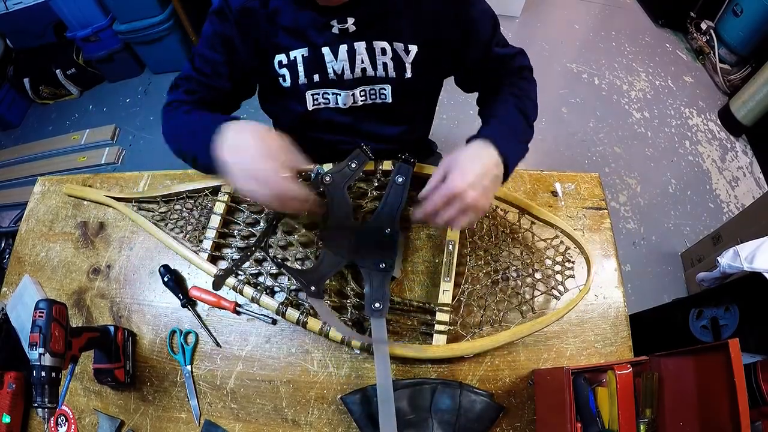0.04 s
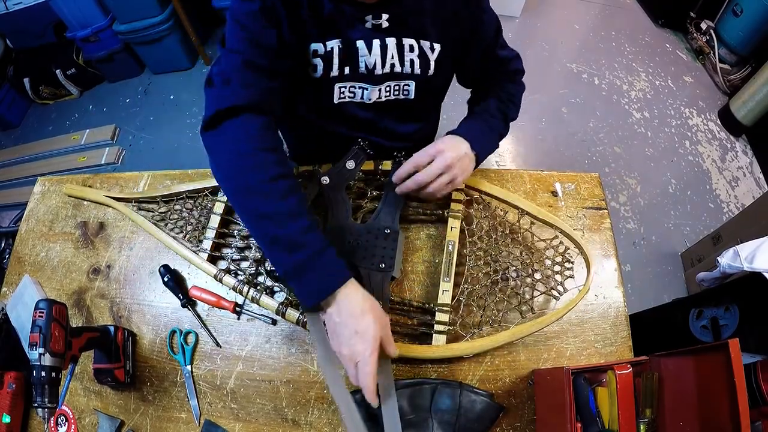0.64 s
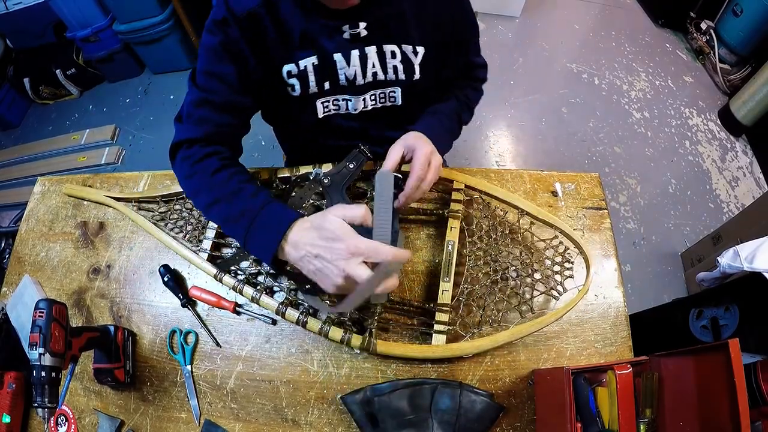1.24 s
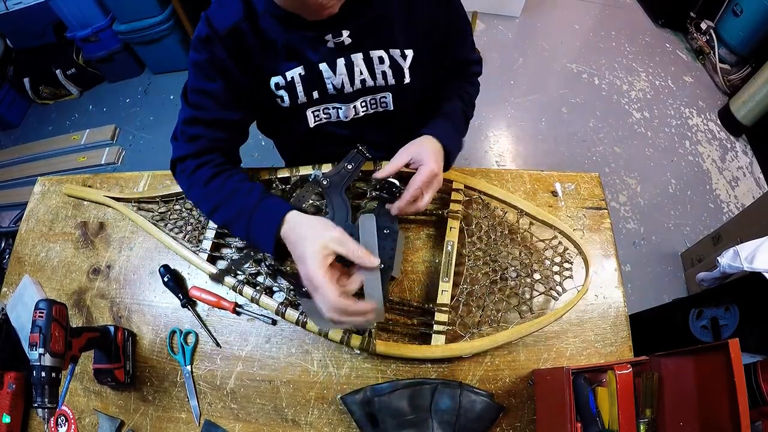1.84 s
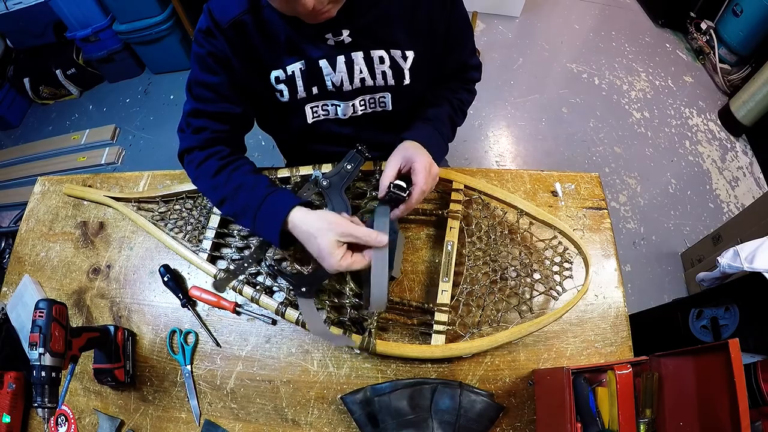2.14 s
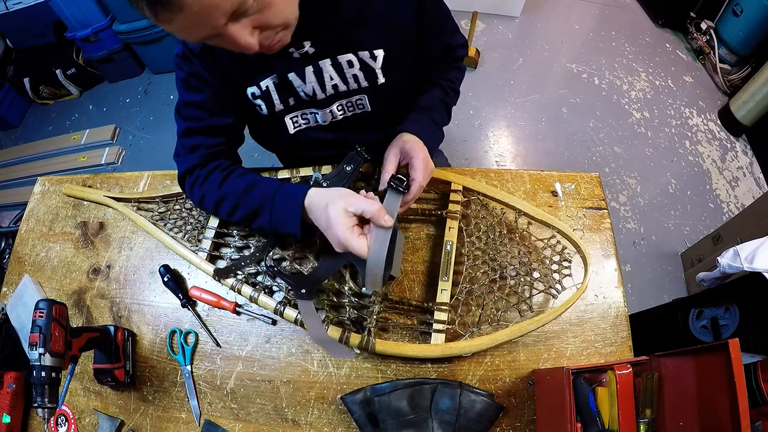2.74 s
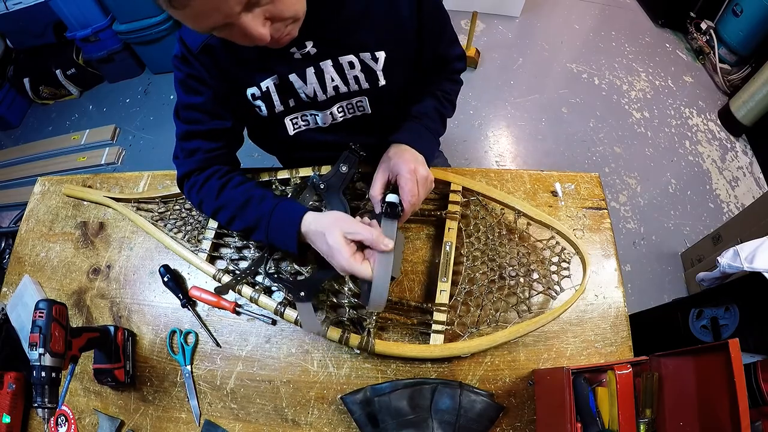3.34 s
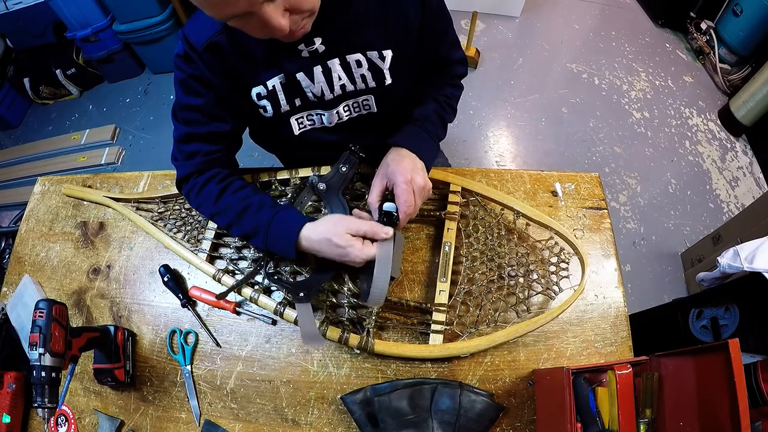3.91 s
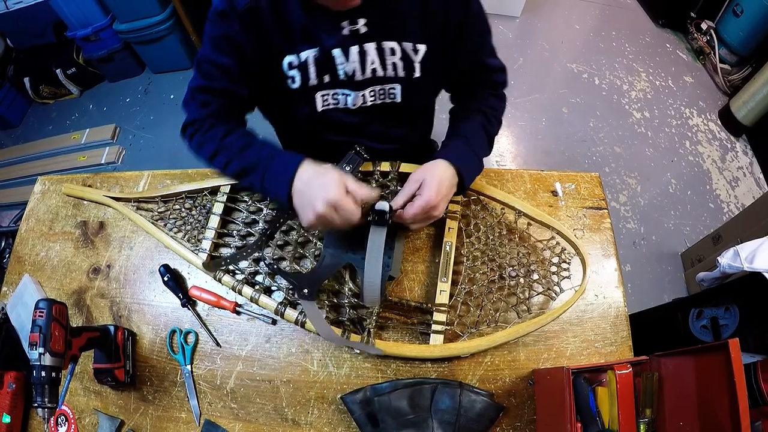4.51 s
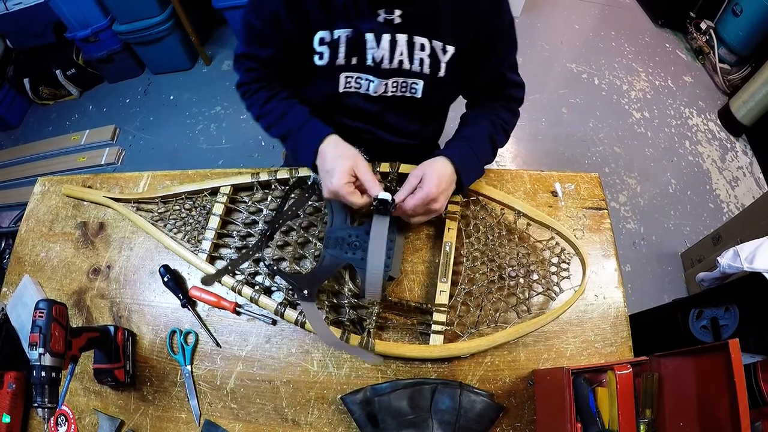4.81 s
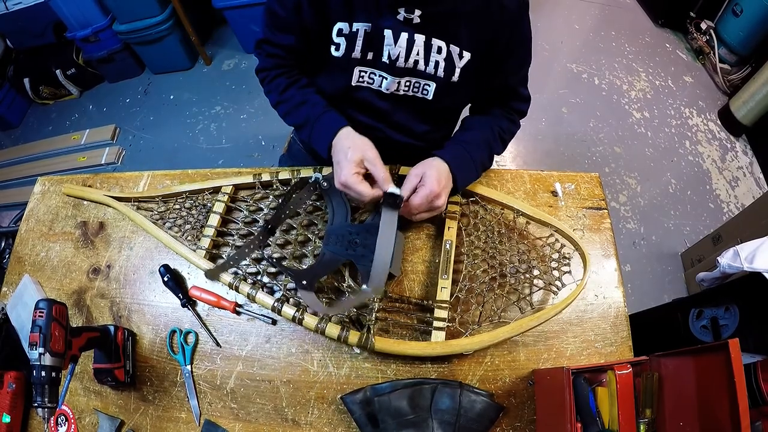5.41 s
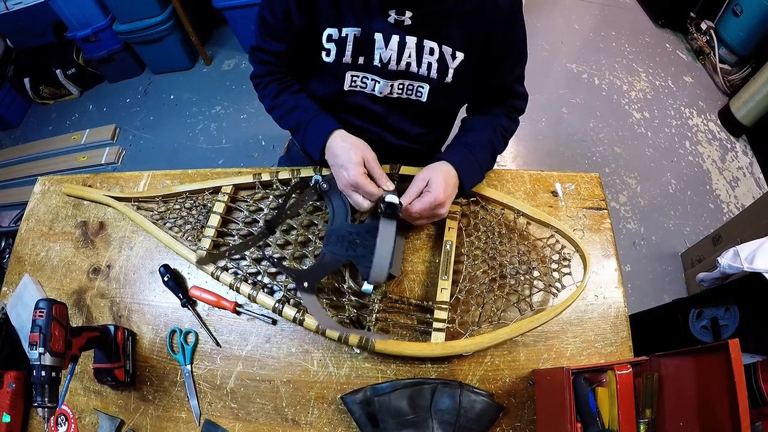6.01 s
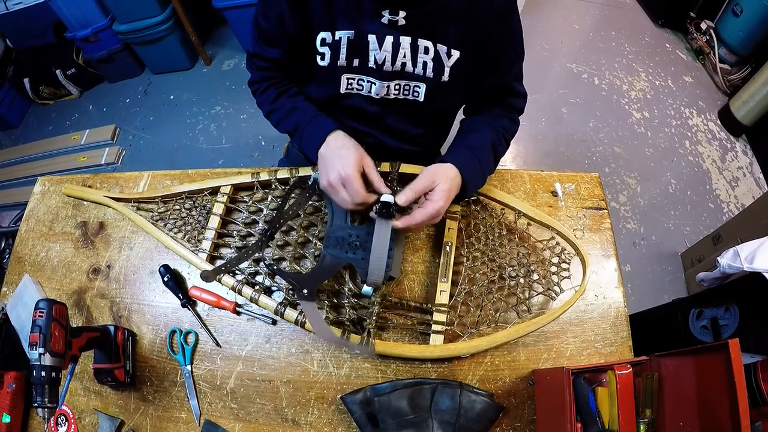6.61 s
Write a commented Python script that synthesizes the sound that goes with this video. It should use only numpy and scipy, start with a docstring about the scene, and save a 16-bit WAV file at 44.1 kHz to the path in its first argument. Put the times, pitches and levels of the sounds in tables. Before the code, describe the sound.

A screwdriver drops and bounces briefly on a wooden workbench. A few faint taps of a metal binding on a snowshoe follow, then the wooden frame knocks on the bench. A toothed strap clicks through a buckle one tooth at a time. Near the end, sleeves rustle softly, the strap zips quickly and the frame thumps loudly, then knocks once more. It all sounds close, in a small workshop with a low hum.

```python
"""Snowshoe binding on a workbench

A screwdriver lands and bounces, ringing the wooden bench top. A toothed strap is threaded into a buckle:
the pawl snaps over single teeth, then zips over a run. The wooden frame knocks on the bench and rocks back.
Strap and sleeves rub faintly over a small workshop's air noise, hum and thin electrical whine."""
import sys
import numpy as np
from scipy import signal
from scipy.fft import rfft, irfft
from scipy.io import wavfile

SR = 44100
rng = np.random.default_rng(int(sys.argv[2]) if len(sys.argv) > 2 else 0)


def pcm_store(signal):
    """Save signal as 16-bit PCM."""
    levels = np.round(np.clip(np.atleast_2d(signal), -1, 1) * 32767)
    wavfile.write(sys.argv[1], SR, levels.astype(np.int16).T)


N = 293706

# Snowshoe frame modes. Each row: frequency in Hz, level in dB, T60 in seconds before contact damping.
FRAME_MODES = [(64.3, -1, 0.209), (140.3, -1, 0.16), (188.4, -5, 0.14), (217, -4.5, 0.49),
               (261, -8.5, 0.19), (316.3, 5, 0.14), (334.4, -4, 0.133), (458, -3, 0.098),
               (533, -5.5, 0.089), (628.8, -1, 0.083), (646.4, 0, 0.055), (712, -2.5, 0.067),
               (763, -3, 0.09), (880, -12.5, 0.09), (898, -15.5, 0.076), (1034, -19.5, 0.099),
               (1242, -12, 0.053), (1322, -18, 0.061), (1403, -17.5, 0.0687)]


def gain_of(db):
    """dB to amplitude factor."""
    return 10 ** (np.asarray(db) / 20)


def unit_rms(x):
    """Scale to rms 1."""
    return x / np.sqrt(np.mean(x ** 2) + 1e-20)


def unit_hit(x):
    """Scale to the energy of 10 ms at rms 1."""
    return x / np.sqrt(np.sum(x ** 2) / (SR * .01))


def curve_at(points, hz):
    """Interpolate on a log-frequency axis."""
    points_hz, values = np.transpose(points)
    return np.interp(np.log(hz + 1), np.log(points_hz + 1), values)


def bump(hz, centre_hz, octaves):
    """Resonant hump of height 1."""
    return 1 / (1 + (np.log2((hz + 1) / centre_hz) / octaves) ** 2)


def add(mix, start_s, sound):
    """Mix in place at start_s."""
    part = mix[max(round(start_s * SR), 0):][:len(sound)]
    part += sound[:len(part)]


def colour(x, db_at, size=4096):
    """Minimum-phase filter with gain db_at(Hz)."""
    log_gain = np.log(gain_of(db_at(abs(np.fft.fftfreq(size, 1 / SR)))))
    impulse = np.fft.ifft(np.exp(np.conj(signal.hilbert(log_gain)))).real
    return signal.fftconvolve(x, impulse[:size // 2])


def noise(gain_at, size):
    """Steady noise, rms 1, spectrum gain_at(Hz)."""
    white = rfft(rng.standard_normal(size))
    return unit_rms(irfft(white * gain_at(np.fft.rfftfreq(size, 1 / SR)), size))


def burst(decay_s, rise_s, size=8192):
    """Dense modes as spectrally flattened noise that swells and dies."""
    t = np.arange(size) / SR
    envelope = np.exp(-t / decay_s) * (1 - np.exp(-t / rise_s))
    spectrum = rfft(rng.standard_normal(size) * envelope)
    flat = irfft(spectrum / (abs(spectrum) + 1e-12))
    return flat * np.minimum(1, 4 * envelope / envelope.max())


def workshop():
    """Moving air, wavering mains hum and fuzzy fan tones."""
    # Air spectrum. Each row: frequency in Hz, relative density in dB.
    air_spectrum = [(15, -38.5), (28, -3), (52, -1.5), (85, -9.5), (160, -16), (300, -18), (500, -26),
                    (1100, -32.5), (1700, -34.5), (2400, -33), (4500, -38), (7000, -44.5), (11000, -50.5),
                    (15000, -51.5)]
    # Machine tones, mains first. Each row: frequency in Hz, level in dB, width in Hz (mains: rms drift).
    machine_tones = [(119.5, -48.5, 0.907), (119.6, -54.5, 8.5), (306.5, -68, 15), (866, -67.5, 32)]
    (mains_hz, mains_db, waver_hz), *fan_tones = machine_tones
    air = gain_of(-48.5) * noise(lambda f: gain_of(curve_at(air_spectrum, f)), N)
    drift_hz = waver_hz * noise(lambda f: 1 / (1 + (f / 3) ** 4), N)
    mains = gain_of(mains_db) * unit_rms(np.sin(2 * np.pi * np.cumsum(mains_hz + drift_hz) / SR))
    fans = sum(gain_of(db) * noise(lambda f: 1 / (1 + (2 * (f - hz) / width_hz) ** 2), N)
               for hz, db, width_hz in fan_tones)
    return air + mains + fans


def whine(centre_hz=8550, width_hz=130, pips_per_s=30, pip_s=.0025, first_s=.0167):
    """Narrow-band electrical hiss flaring in regular pips."""
    phase = np.pi * pips_per_s * (np.arange(N) / SR - first_s)
    pips = gain_of(-13) + np.exp(-(np.sin(phase) / (np.pi * pips_per_s * pip_s)) ** 2)
    hiss = noise(lambda f: 1 / (1 + (2 * (f - centre_hz) / width_hz) ** 4), N)
    return gain_of(-84) * unit_rms(pips * hiss)


def wood_blow(modes, thump_db, slope_db_oct, spot_hz, spot_db, clatter_db):
    """Struck wood: the spot hit favours one band, hardness tilts the treble."""
    # Dense, short-lived overtones. Each row: frequency in Hz, relative density in dB.
    clatter_spectrum = [(60, -3.5), (300, 12.5), (700, 5.5), (1100, 0), (1500, -6), (2200, -14),
                        (3200, -21.5), (5000, -31.5), (8000, -47.5), (15000, -53.5)]
    t = np.arange(SR // 2) / SR
    ring = np.zeros(len(t))
    for k, (hz, db, t60_s) in enumerate(modes):
        swell = 1 - np.exp(-t / (0.096 * t60_s))  # the blow spreads through the wood
        ring += (-1) ** k * gain_of(db - 60 * t / t60_s) * swell * np.sin(2 * np.pi * hz * t)
    damping_db = -11 * t ** 6 / (t ** 6 + 0.066 ** 6)  # the wood settles back into contact
    body = unit_hit(ring * gain_of(damping_db))
    clatter = colour(burst(decay_s=0.0093, rise_s=0.00095), lambda f: curve_at(clatter_spectrum, f))
    add(body, 0, gain_of(clatter_db) * unit_hit(clatter))
    body = colour(body, lambda f: thump_db * bump(f, 65, octaves=0.98)
                  + spot_db * bump(f, spot_hz, octaves=0.28)
                  + slope_db_oct * np.log2(np.clip(f / 600, 1, 4)))
    return unit_hit(body)


def screwdriver():
    """The tool lands and rocks on the bench top, each bounce with the same treble tilt."""
    # Bench modes. Each row: frequency in Hz, level in dB, T60 in seconds before contact damping.
    bench_modes = [(144, -1.5, 0.096), (220.7, -1, 0.35), (271, -7, 0.34), (410.4, -10, 0.33),
                   (506.6, -9.5, 0.21), (644, -5, 0.14), (741.7, 1.5, 0.076), (883, -5.5, 0.074),
                   (1078, -5, 0.056), (1400, -7, 0.038), (1707, -10, 0.028)]
    # Bounces. Each row: start in seconds, level in dB, thump in dB, favoured band in Hz, its boost in dB.
    bounces = [(.001, -21.5, 11, 215, 14), (0.0396, -17, 10, 1620, 2.5), (.0555, -16.5, 15, 740, 5),
               (0.0981, -17.5, -3, 760, 7)]
    out = np.zeros(N)
    for start_s, db, thump_db, spot_hz, spot_db in bounces:
        blow = wood_blow(bench_modes, thump_db, slope_db_oct=1.5,
                         spot_hz=spot_hz, spot_db=spot_db, clatter_db=-3.5)
        add(out, start_s, gain_of(db) * blow)
    return out


def rubbing(strokes, centre_hz, octaves):
    """Grainy friction: surfaces catch and slip."""
    out = np.zeros(N)
    for start_s, length_s, db in strokes:
        size = max(int(length_s * SR), 256)
        grip = gain_of(3.2 * noise(lambda f: 1 / (1 + (f / 120) ** 2), size))
        hiss = noise(lambda f: bump(f, centre_hz, octaves) ** 2, size)
        add(out, start_s, gain_of(db) * unit_rms(hiss * grip * np.hanning(size)))
    return out


def strap_slides():
    """The strap hisses through the fingers."""
    # Slides. Each row: start in seconds, length in seconds, level in dB.
    slides = [(.195, .036, -66), (.379, 0.04, -67.5), (4.755, 0.071, -57.5), (5.249, 0.082, -67),
              (6.352, 0.043, -65)]
    return rubbing(slides, centre_hz=3770, octaves=1.44)


def buckle_click(ring_hz, ring_db, slope_db_oct, overtone):
    """A snap rings the buckle's two lowest modes; the grip sets their pitch."""
    # Bare pawl snap. Each row: frequency in Hz, relative density in dB.
    snap_spectrum = [(100, -12.5), (500, -10.5), (1150, -9), (1450, -1.5), (2100, -5), (3100, 0),
                     (4200, -2.5), (5300, -0.5), (6800, -12), (8400, -8.5), (10500, -13.5), (13300, -12.5),
                     (15000, -32)]

    def resonance(f):
        return bump(f, ring_hz, octaves=0.2) + overtone * bump(f, 1.89 * ring_hz, octaves=0.083)

    snap = burst(decay_s=0.0018, rise_s=0.00085)
    add(snap, .0037, gain_of(-2) * burst(decay_s=0.003, rise_s=0.00034))  # scatter off bench clutter
    linger_s = .002 + 0.013 / (1 + (ring_hz / 6000) ** 6)  # high modes die sooner
    ring = colour(burst(decay_s=linger_s, rise_s=0.00089), lambda f: 30 * (resonance(f) - 1))
    add(snap, 0, gain_of(-1.5) * ring)
    snap = colour(snap, lambda f: curve_at(snap_spectrum, f) + ring_db * resonance(f)
                  + slope_db_oct * np.log2(1 + f / 3000))
    return unit_hit(snap)


def binding_taps(wood_lag_s=0.00197):
    """The binding taps the frame, metal just ahead of wood. Returns (metal, wood)."""
    # Taps. Each row: start in seconds, relative metal level in dB, wood level in dB, thump in dB,
    # ring in Hz, ring boost in dB, metal treble slope in dB per octave.
    taps = [(0.9917, -35, -28, -9, 5470, 4.5, -11.5), (1.129, -54, -34, -11, 4800, 6, -10),
            (1.588, -32.5, -41.5, 8, 6730, 17, -5), (4.378, -46, -37, -7, 3000, 5, -11)]
    metal, wood = np.zeros((2, N))
    for start_s, metal_db, wood_db, thump_db, ring_hz, ring_db, slope_db_oct in taps:
        add(metal, start_s, gain_of(metal_db) * buckle_click(ring_hz, ring_db, slope_db_oct, overtone=1))
        blow = wood_blow(FRAME_MODES, thump_db, slope_db_oct=0, spot_hz=385, spot_db=5, clatter_db=-6)
        add(wood, start_s + wood_lag_s, gain_of(wood_db) * blow)
    return metal, wood


def sleeve_brushes():
    """Sleeves brush the frame with a dull rustle."""
    # Brushes. Each row: start in seconds, length in seconds, level in dB.
    brushes = [(2.006, .16, -58.5), (4.775, 0.059, -56.5), (4.902, 0.077, -59.5), (5.013, 0.17, -57.5),
               (5.241, .18, -49), (5.469, .16, -57)]
    return rubbing(brushes, centre_hz=428, octaves=0.86)


def frame_knocks():
    """The frame hits the bench, jolts the buckle, falls back under its weight. Returns (metal, wood)."""
    # Knocks. Each row: start in seconds, level in dB, thump in dB, favoured band in Hz,
    # relative jolt level in dB, rock-back delay in seconds, rock-back's favoured band in Hz.
    knocks = [(3.0226, -15.5, -0.5, 590, -49, .104, 680), (5.3715, -19.5, 4.5, 644, -48, 0.15, 332),
              (5.8754, -5, 5, 290, -24.5, .13, 64), (6.2136, -16.5, 2, 710, -34.5, 0.071, 695)]
    metal, wood = np.zeros((2, N))
    for start_s, db, thump_db, spot_hz, jolt_db, rock_s, rock_hz in knocks:
        knock = wood_blow(FRAME_MODES, thump_db, slope_db_oct=7.5 + 0.35 * db,
                          spot_hz=spot_hz, spot_db=1.8, clatter_db=-13)
        jolt = buckle_click(ring_hz=3000, ring_db=2, slope_db_oct=-25, overtone=0)
        thud = wood_blow(FRAME_MODES, thump_db=17, slope_db_oct=-8.5,
                         spot_hz=rock_hz, spot_db=7, clatter_db=-2.5)
        add(wood, start_s, gain_of(db) * knock)
        add(metal, start_s, gain_of(jolt_db) * jolt)
        add(wood, start_s + rock_s, gain_of(-31.5) * thud)
    return metal, wood


def pawl_clicks(clicks, flat_at_db=-18):
    """The harder the pawl snaps, the brighter the click."""
    out = np.zeros(N)
    for start_s, db, ring_hz, ring_db in clicks:
        click = buckle_click(ring_hz, ring_db, slope_db_oct=0.43 * (db - flat_at_db), overtone=0.55)
        add(out, start_s, gain_of(db) * click)
    return out


def buckle_nudges(ring_hz=4560, ring_db=8.5):
    """Fingers nudge the loose buckle into faint ticks."""
    # Nudges. Each row: start in seconds, relative level in dB.
    nudges = [(3.44, -56), (4.6635, -51), (5.1222, -53), (5.152, -50.5)]
    return pawl_clicks((start_s, db, ring_hz, ring_db) for start_s, db in nudges)


def pawl_teeth():
    """The pawl snaps over teeth one by one, and near 3.9 s runs quickly over a few in a row."""
    # Teeth. Each row: start in seconds, relative level in dB, ring in Hz, ring boost in dB.
    teeth = [(3.6117, -33, 4180, 12.5), (3.67, -30, 5600, 4), (3.753, -29.5, 5150, 10),
             (3.8335, -32.5, 3170, 2.5), (3.894, -28.5, 1580, 3), (3.9039, -18, 4050, 10),
             (3.911, -17.5, 4150, 11), (3.928, -29, 3280, 17), (5.4603, -26, 4460, 10),
             (5.683, -22, 4580, 14)]
    return pawl_clicks(teeth)


def strap_zip(start_s=5.7785, first_gap_s=.0225, steady_gap_s=.0093, ring_hz=4590, ring_db=12):
    """One quick pull: as the strap gathers speed, teeth come closer and hit harder."""
    tooth = np.arange(8)
    gaps_s = steady_gap_s + (first_gap_s - steady_gap_s) * np.exp(-tooth / .75)
    times_s = start_s + np.cumsum(gaps_s) - gaps_s
    levels_db = -15.5 - 5 * np.exp(-tooth / 1.8)
    return pawl_clicks((at_s, db, ring_hz, ring_db) for at_s, db in zip(times_s, levels_db))


def room(x, wet_db, echoes_per_s=4000):
    """Sparse wall reflections, each band dying at its own rate."""
    # Room decay. Each row: frequency in Hz, T60 in seconds.
    room_t60 = [(100, 0.69), (280, 0.25), (500, 0.19), (1500, 0.19), (3000, 0.23), (4500, 0.28),
                (7000, 0.2), (14000, .17)]
    size = SR // 2
    onset = np.clip((np.arange(size) / SR - .005) / 0.001, 0, 1)
    echoes = rng.choice([-1., 1.], size) * (rng.random(size) < echoes_per_s / SR) * onset
    hz, time_s, bands = signal.stft(echoes, SR, nperseg=512)
    decay = gain_of(-60 * time_s / curve_at(room_t60, hz)[:, None])
    tail = signal.istft(bands * decay, SR, nperseg=512)[1]
    return gain_of(wet_db) * signal.fftconvolve(x, tail / np.linalg.norm(tail))[:N]


def scene():
    """Mono mix of buckle, wood, hands and workshop; the wood's bass arrives mostly direct."""
    tap_metal, tap_wood = binding_taps()
    knock_metal, knock_wood = frame_knocks()
    metal = gain_of(-0.56) * (tap_metal + knock_metal + buckle_nudges() + pawl_teeth() + strap_zip())
    wood = screwdriver() + tap_wood + knock_wood
    wood_send = colour(wood, lambda f: -9 / (1 + (f / 700) ** 4))
    reverb = room(metal, wet_db=-8) + room(wood_send, wet_db=-5.5)
    hands = strap_slides() + sleeve_brushes()
    return (metal + wood + reverb + hands + workshop() + whine())[None]


def record(dry):
    """Band limit: low-pass at 15450 Hz."""
    lowpass = signal.firwin(401, 15450, window=("kaiser", 8), fs=SR)
    return signal.oaconvolve(dry, lowpass[None], "same")


dry = scene()
out = record(dry)
pcm_store(out)
```